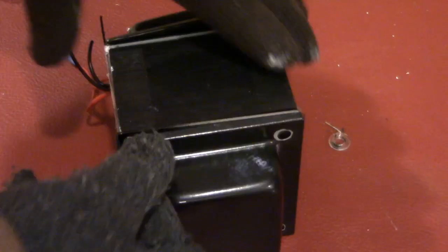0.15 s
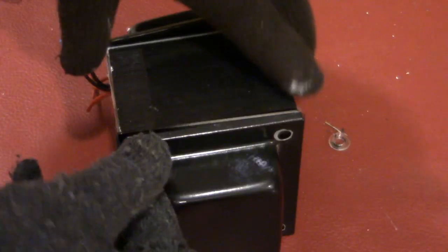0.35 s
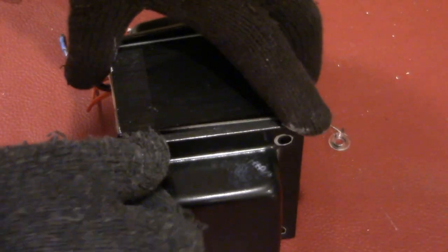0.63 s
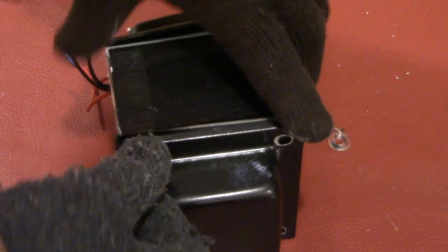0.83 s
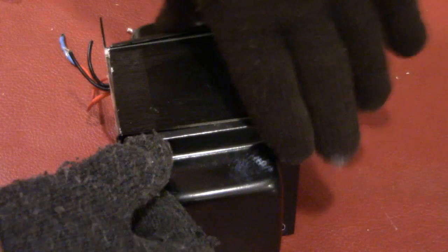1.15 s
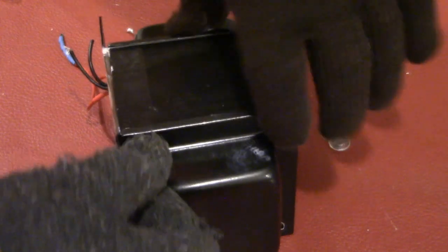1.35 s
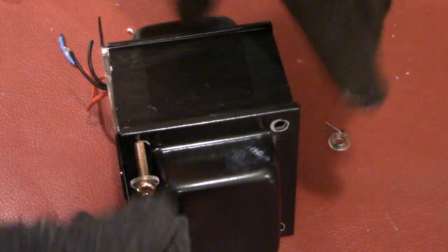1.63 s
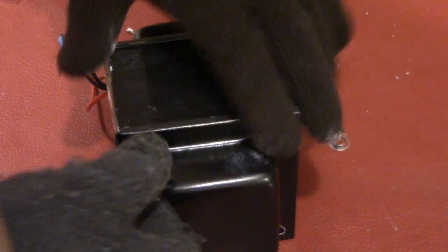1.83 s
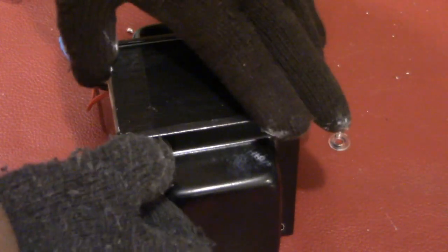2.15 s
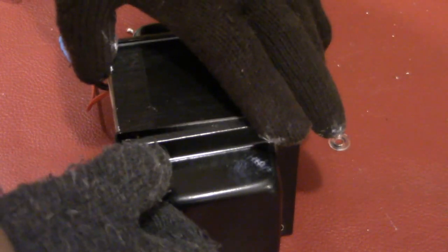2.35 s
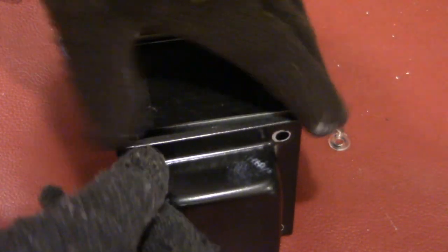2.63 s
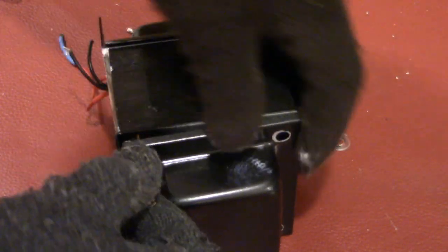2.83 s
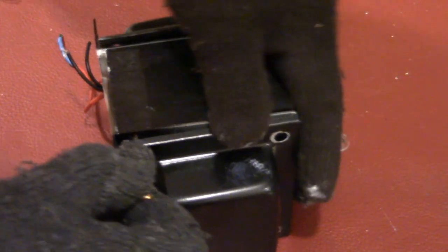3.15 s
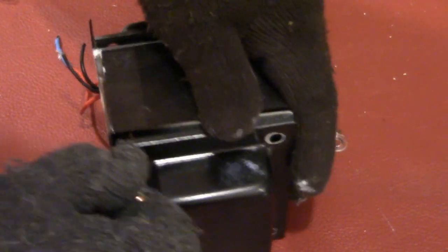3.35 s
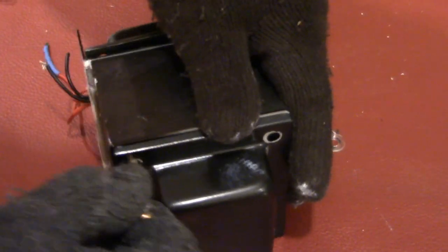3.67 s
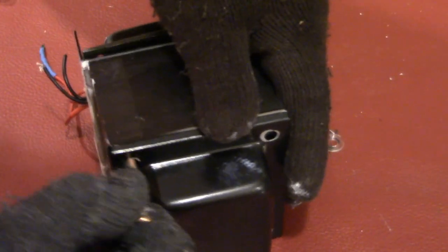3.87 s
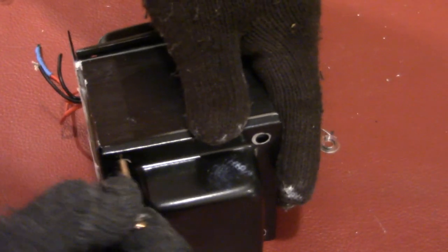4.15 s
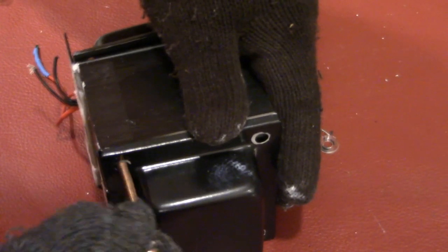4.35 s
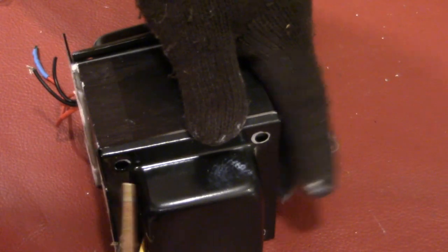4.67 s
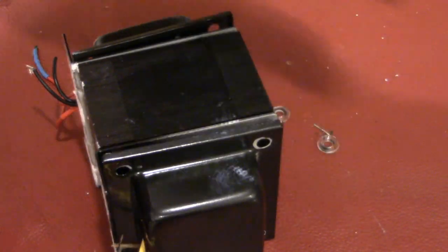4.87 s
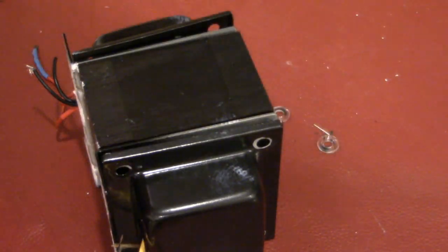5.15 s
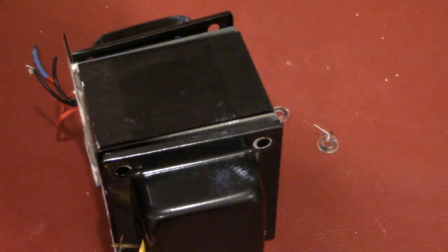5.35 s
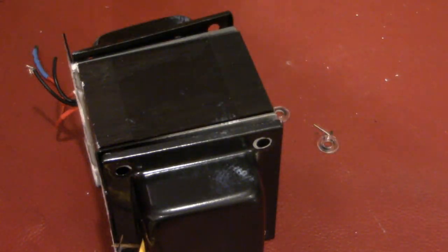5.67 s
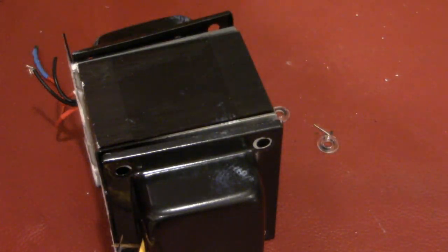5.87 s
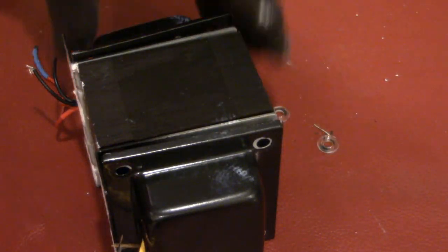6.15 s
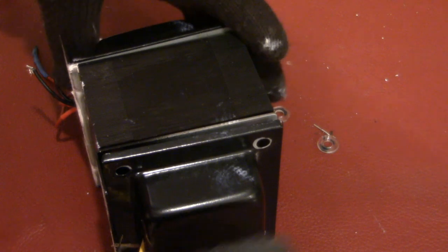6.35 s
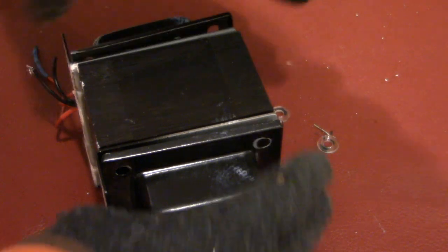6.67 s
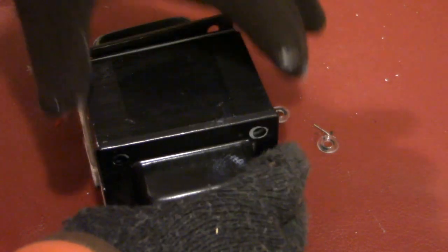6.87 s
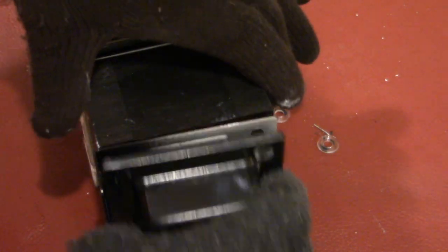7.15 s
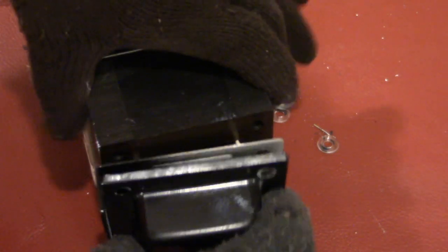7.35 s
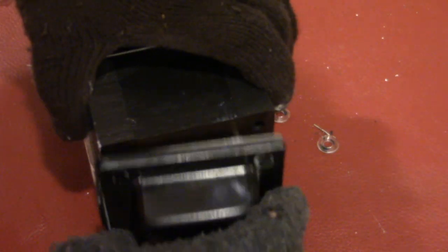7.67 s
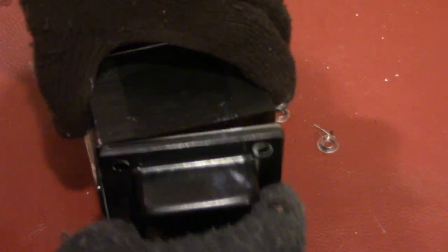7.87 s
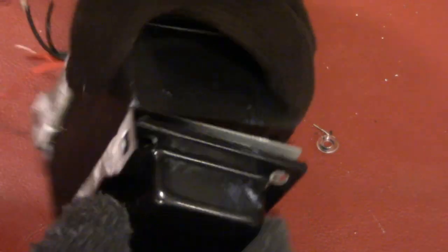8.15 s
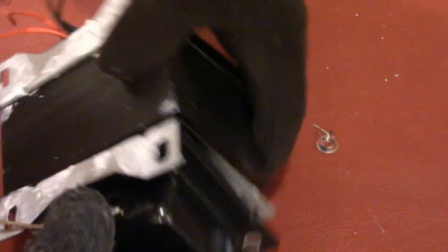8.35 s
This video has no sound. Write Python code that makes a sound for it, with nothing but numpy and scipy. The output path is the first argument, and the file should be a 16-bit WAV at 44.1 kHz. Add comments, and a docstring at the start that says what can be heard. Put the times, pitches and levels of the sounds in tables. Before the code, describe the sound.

Steel on steel, close-miked with slight stereo width and a short room tail over faint hush. Uneven clusters of hard, mid-pitched clacks with a short flange ring, knit gloves rubbing between them, one strong knock, then a rattling, raspy bolt withdrawal. A quiet gap, a clear high clink, and finally subdued taps, gritty sliding, a dull mat rub and a low padded thud.

```python
"""A padded bench in a small room: gloved hands work a pressed steel cover off a heavy iron transformer core.
The cover clacks, a long bolt rattles and rasps out, a small steel piece clinks down; then the cover is
drawn off and the core slid round and tipped on the mat. Steel is noisy contact force driving damped modes;
gloves, grinding, scrapes and drag are filtered grain; bumps are filtered noise bursts, over a steady hush."""
import sys
import numpy as np
from scipy import signal
from scipy.fft import rfft, irfft
from scipy.io import wavfile
from scipy.ndimage import uniform_filter1d

SR = 44100
rng = np.random.default_rng(int(sys.argv[2]) if len(sys.argv) > 2 else 0)


def inscribe(sig):
    """Save sig as 16-bit PCM at rate SR to the path in sys.argv[1].

    A 1-D sig is mono; a 2-D sig holds one channel per row.
    Samples are clipped to [-1, 1] before scaling.
    """
    pcm = np.round(np.clip(np.atleast_2d(sig).T, -1, 1) * 32767)
    wavfile.write(sys.argv[1], SR, pcm.astype(np.int16))


N = 375291


def gain_of(db):
    """Decibels to amplitude."""
    return 10 ** (np.asarray(db) / 20)


def evened(x):
    """Scales to rms 1."""
    return x / np.sqrt(np.mean(x ** 2) + 1e-20)


def read(points, hz):
    """Interpolates (Hz, value) points on a log-frequency axis."""
    point_hz, value = np.transpose(points)
    return np.interp(np.log(hz + 1), np.log(point_hz + 1), value)


def add(mix, start_s, sound):
    """Mixes a sound in at start_s."""
    part = mix[max(round(start_s * SR), 0):][:len(sound)]
    part += sound[:len(part)]


def colour(x, points, size=2048):
    """Causal minimum-phase filter with the given spectrum, (Hz, dB)."""
    log_gain = np.log(gain_of(read(points, abs(np.fft.fftfreq(size, 1 / SR)))))
    taps = np.fft.ifft(np.exp(np.conj(signal.hilbert(log_gain)))).real
    return signal.oaconvolve(x, taps)[:len(x)]


def band_energy(x, lo_hz, hi_hz):
    """Energy of x between two frequencies."""
    hz = np.fft.rfftfreq(len(x), 1 / SR)
    in_band = (hz > lo_hz) & (hz < hi_hz)
    return 2 * np.sum(abs(rfft(x)[in_band]) ** 2) / len(x)


def ring(modes, t, detune, scatter_db):
    """Exponentially dying modes; grip and point of impact shift their pitch and strength a little."""
    hz, width_hz, db = np.transpose(modes)[:, :, None]
    shift, strength, sign = rng.standard_normal((3, len(hz), 1))
    size = np.sign(sign) * gain_of(db + scatter_db * strength) * 2 * np.pi * width_hz / SR
    decay = np.exp(-np.pi * width_hz * t)
    tone = np.cos(2 * np.pi * hz * (1 + detune * shift) * t)
    return np.sum(size * decay * tone, 0)


def friction(stroke, spectrum, snags_per_s, snag_db, uneven_db):
    """Fine rubbing with sparse snags, under an unsteady pressure."""
    snags = (rng.random(N) < snags_per_s / SR) * rng.standard_normal(N)
    grain = rng.standard_normal(N) + gain_of(snag_db) * evened(snags)
    drift = uniform_filter1d(rng.standard_normal(N), size=700)
    pressure = evened(uniform_filter1d(drift, size=400))
    return stroke * gain_of(uneven_db * pressure) * evened(colour(grain, spectrum))


def strokes(rows, attack_s, release_s):
    """Each movement of the hand gathers speed, holds it and dies away."""
    t = np.arange(N) / SR
    envelope = np.zeros(N)
    for start_s, length_s, db in rows:
        attack = np.clip((t - start_s) / attack_s, 0, 1)
        release = np.exp(-np.maximum(t - start_s - length_s, 0) / release_s)
        envelope += gain_of(db) * attack * release
    return envelope


# Background hush spectrum. Each row: frequency in Hz, level in dB per Hz.
AIR_SPECTRUM = [(15, -60.5), (123, -12.5), (450, -8.5), (650, -13.5), (1520, -15.5), (11300, -32.5),
                (16000, -47)]
AIR_DB = -58


def air():
    """Steady background hush: filtered noise."""
    return gain_of(AIR_DB) * evened(colour(rng.standard_normal(N), AIR_SPECTRUM))


# Soft bumps on the bench. Each row: start in seconds, level in dB, decay in seconds, lowest frequency in Hz.
BENCH_BUMPS = [(.131, -38, 0.0048, 120), (0.16, -40, 0.009, 130), (7.751, -50, 0.082, 79),
               (8.414, -31.5, 0.035, 30)]
# Padded bench response. Each row: frequency in Hz, level in dB per Hz.
BENCH_SPECTRUM = [(30, -22), (80, -0.5), (380, -1.5), (600, -10.5), (6000, -40)]


def bumps():
    """Dull pushes on the padded bench: noise bursts through a low, damped response."""
    out, t = np.zeros(N), np.arange(SR // 3) / SR
    for start_s, db, decay_s, lowest_hz in BENCH_BUMPS:
        impulse = 1. * (t == 0)
        highpass = signal.butter(2, lowest_hz, "highpass", fs=SR)
        thump = signal.lfilter(*highpass, colour(impulse, BENCH_SPECTRUM))
        thump /= np.linalg.norm(thump)
        swell = np.minimum(t / .003, 1) * np.exp(-np.maximum(t - .008, 0) / decay_s)
        push = swell * rng.standard_normal(len(t))
        add(out, start_s, gain_of(db) * signal.fftconvolve(push, thump))
    return out


# Small piece set down. Each row: start in seconds, level in dB, hardness 0-1, finger damping factor (1 = free).
PIECE_CLINKS = [(5.101, -41, 0, 16), (0.16, -29, 0.18, 15), (5.688, -32, 0, 1.2),
                (5.8296, -14.5, 0.83, 1.23)]
# Small piece's modes, mostly beating pairs. Each row: frequency in Hz, width in Hz, level in dB at a soft
# touch, level in dB at a hard touch.
PIECE_MODES = [(2810, 29, 9, -0.5), (2865, 16, -12, 3), (7790, 22, -8, -2.5), (7820, 34, -34, 5),
               (15500, 38, -55, 8)]
# Tick of its touch. Each row: frequency in Hz, level in dB per Hz.
TOUCH_SPECTRUM = [(30, -19), (150, 0.5), (1600, -9.5), (3000, 6.5), (4500, -11.5), (16000, -9)]
TOUCH_DECAY_S, TOUCH_DB = 0.0074, -11.5
BOUNCE_GAP_S, BOUNCE_DB, BOUNCE_FADE_DB_PER_S = 0.0089, -8.5, -150


def small_piece(count=8):
    """Light steel touches down and rocks to rest in uneven, fading bounces; fingers choke ring and bounces."""
    out, t = np.zeros(N), np.arange(SR // 2) / SR
    for start_s, db, hardness, damping in PIECE_CLINKS:
        modes = [(hz, width_hz * damping, soft_db + (hard_db - soft_db) * hardness)
                 for hz, width_hz, soft_db, hard_db in PIECE_MODES]
        tone = ring(modes, t, detune=0, scatter_db=0)
        tick = evened(colour(rng.standard_normal(len(t)), TOUCH_SPECTRUM)) * np.exp(-t / TOUCH_DECAY_S)
        sound = gain_of(db) * (tone / abs(tone).max() + gain_of(TOUCH_DB) * tick)
        add(out, start_s, sound)
        for late_s in np.cumsum(BOUNCE_GAP_S * (.5 + rng.random(count))):
            bounce_gain = gain_of(BOUNCE_DB + BOUNCE_FADE_DB_PER_S * late_s) / damping
            add(out, start_s + late_s, bounce_gain * sound)
    return out


# Knitted gloves stroking steel. Each row: start in seconds, length in seconds, level in dB.
GLOVE_STROKES = [(.27, 0.22, -54), (.62, 0.35, -60.5), (1.44, 0.02, -38), (2.4, 0.15, -56.5),
                 (2.64, 0.54, -54), (4.55, 0.25, -60), (7.6, 0.13, -49.5), (7.9, 0.79, -53.5)]
# Glove rub spectrum. Each row: frequency in Hz, level in dB per Hz.
GLOVE_SPECTRUM = [(100, -4.5), (600, 1.5), (1000, 1), (1400, 13), (1800, -5.5), (3200, 1), (5000, -9),
                  (8000, -1), (11000, -12), (16000, -24)]
BRUSH_ATTACK_S, BRUSH_RELEASE_S = 0.063, 0.058


def gloves():
    """Knit rubbing over steel: fine grain with a few snags."""
    stroke = strokes(GLOVE_STROKES, BRUSH_ATTACK_S, BRUSH_RELEASE_S)
    return friction(stroke, GLOVE_SPECTRUM, snags_per_s=45, snag_db=-6.5, uneven_db=3.0)


EASE_DB_PER_S = -120  # contact pressure eases towards the end


def chatter(t, contact_s, rise_s, release_s, spikiness, order=3):
    """Rough contact from t = 0: a brief graze, then clumps of tiny impacts that ease off, even over frequency."""
    graze = np.exp(np.minimum(t, 0) / rise_s - np.maximum(t - contact_s, 0) / release_s)
    press = graze * gain_of(EASE_DB_PER_S * t)
    clumps = gain_of(2 * evened(uniform_filter1d(rng.standard_normal(len(t)), size=70)))
    impacts = rng.standard_normal(len(t)) * np.exp(spikiness * rng.standard_normal(len(t)))
    force = press * clumps * impacts
    # alternately flatten the spectrum and cut off the late part
    for _ in range(order):
        z = rfft(force)
        z /= np.sqrt(uniform_filter1d(abs(z) ** 2, size=len(t) // 50, mode="mirror") + 1e-12)
        force = irfft(z, len(t)) * (t < contact_s + 5 * release_s)
    return force / np.linalg.norm(force)


# Wash of the pressed sheet's weak modes. Each row: frequency in Hz, level in dB per Hz.
SHEET_SPECTRUM = [(200, -20), (1900, -5), (3300, -5), (7000, -5.5), (16000, -22)]
SHEET_WIDTH_HZ, SHEET_LOSS_HZ_PER_HZ, SHEET_DB = 9.6, 0.0033, -9.5


def sheet_wash(size):
    """Countless weak sheet modes blur to noise, new at each strike; the higher, the sooner they die."""
    hz, t, z = signal.stft(rng.standard_normal(size), SR, nperseg=256)
    width_hz = SHEET_WIDTH_HZ + SHEET_LOSS_HZ_PER_HZ * hz[:, None]
    wash = signal.istft(z * np.exp(-np.pi * width_hz * t), SR, nperseg=256)[1][:size]
    return gain_of(SHEET_DB) * colour(wash / np.linalg.norm(wash), SHEET_SPECTRUM)


# Modes of cover and core. Each row: frequency in Hz, width in Hz, level in dB.
COVER_MODES = [(456, 16, -13), (764, 87, -3.5), (862, 90, -7), (998, 37, -2), (1110, 160, -4.5),
               (1695, 38, -3), (2206, 31, 2), (3110, 87, -2), (3330, 80, -3), (3660, 71, -8),
               (4430, 73, -12), (5340, 45, -7.5), (6280, 40, -1.5), (7600, 97, -4.5), (9700, 110, -13)]
# Flange's close, beating modes. Each row: frequency in Hz, width in Hz, level in dB.
FLANGE_MODES = [(1333, 25.2, 2.5), (1408, 29, 0), (1383, 9, 6.5)]
# Quickly damped clack of the clamped parts. Each row: frequency in Hz, level in dB per Hz.
CLACK_SPECTRUM = [(160, -25.5), (400, -8), (900, -1), (1350, 1.5), (1900, -18), (3200, -2), (4800, -11),
                  (8000, -2.5), (11000, -8.5), (12500, -19.5), (16000, -19)]
# Thud, body, flange ring, clang, bite and edge. Each row: low limit in Hz, high limit in Hz.
REGISTER_BANDS = [(120, 550), (600, 1150), (1200, 1600), (1700, 2600), (2700, 5400), (5500, 15000)]
# mix ahead of the register levelling
CLACK_DB, MODES_DB = -3.0, 6
# in a rasp the contact point travels, so single modes stand out less
RASP_BLUR_DB_PER_S = 218
# a tight grip chokes the flange and passes more of the blow into the core's body and the bench
FLANGE_FREE_DB, FLANGE_CHOKE_DB, GRIP_WIDENS_HZ = 12, 18, 30
BODY_FREE_DB, BODY_GRIP_DB = -14.5, 23.5  # body against flange
THUD_FREE_DB, THUD_GRIP_DB = -20.5, 9
# while in its hole the bolt damps and slightly stiffens the flange (factor, added pitch fraction)
BOLT_OUT_S, BOLT_DAMPING, BOLT_STIFFENING = 4.6, 1.88, 0.0066


def knock(start_s, contact_s, db, edge_db, grip):
    """Chatter sets off a short clack and the longer modes; harder contacts have more bite and edge."""
    t = np.arange(12288) / SR - .003
    force = chatter(t, contact_s, rise_s=.0003, release_s=.0012, spikiness=.4)
    stiffer, damper = (1 + BOLT_STIFFENING, BOLT_DAMPING) if start_s < BOLT_OUT_S else (1, 1)
    flange_db = FLANGE_FREE_DB - FLANGE_CHOKE_DB * grip
    flange = [(hz * stiffer, width_hz * damper + GRIP_WIDENS_HZ * grip, level_db + flange_db)
              for hz, width_hz, level_db in FLANGE_MODES]
    rings = ring(COVER_MODES + flange, t - t[0], detune=.002 + .018 * grip, scatter_db=3)
    modes = gain_of(MODES_DB - RASP_BLUR_DB_PER_S * contact_s) * rings + sheet_wash(size=len(t))
    clack = gain_of(CLACK_DB) * colour(force, CLACK_SPECTRUM)
    sound = clack + signal.fftconvolve(force, modes)[:len(t)]
    # share the blow's energy out among the registers
    body = 1 / (1 + gain_of(-BODY_FREE_DB - BODY_GRIP_DB * grip) ** 2)
    share_db = np.array([THUD_FREE_DB + THUD_GRIP_DB * grip,
                         10 * np.log10(body),
                         10 * np.log10(1 - body),
                         0.3 * edge_db - 7.5,
                         0.5 * edge_db - 0.5,
                         edge_db])
    energy = np.array([band_energy(sound, *band) for band in REGISTER_BANDS])
    power = energy / ((contact_s + .006) * SR)
    levels_db = db + share_db - 10 * np.log10(power)
    shape = [(40, levels_db[0] - 28)]
    for (lo_hz, hi_hz), level_db in zip(REGISTER_BANDS, levels_db):
        shape += [(lo_hz * 1.08, level_db), (hi_hz / 1.08, level_db)]
    return start_s + t[0], colour(sound, shape)


# Steel knocking on steel; a long contact is a rasp. Each row: start in seconds, contact in seconds, clack
# level in dB, sharp edge in dB above the clack, grip on the cover 0-1.
COVER_KNOCKS = [(0.5584, 0.0032, -31.5, -9, 0.52), (0.9958, 0.0022, -15.5, -6, 0.6),
                (1.0081, 0.0021, -15.5, -7.5, 0.67), (1.1671, 0.012, -12, -7.5, 0.31),
                (1.184, 0.02, -22, -10.5, 0.47), (1.2084, 0.0074, -14.5, -6.5, 0.77),
                (1.39, 0.0024, -19, -15.5, 0.45), (1.674, 0.008, -23, -12, 0.29),
                (1.774, 0.006, -32, -15, 0.33), (1.945, 0.0017, -23.5, -21, 0.37),
                (1.952, 0.0048, -21.5, -6, 0.05), (2.0735, 0.0057, -27.5, -30, 1),
                (2.088, 0.006, -18.5, -11.5, 0.65), (2.114, 0.0041, -40, -34, .9),
                (2.1734, 0.0033, -28, -28, 0.57), (2.188, 0.0048, -27, -24, 0.43),
                (2.198, .005, -29, -25, 0.3), (2.2093, 0.0015, -34, -2, 0.7),
                (2.4524, 0.002, -32, -24, 0.46), (2.871, 0.0029, -35.5, -22, 0.43),
                (3.0778, 0.006, -33.5, -24.5, 0.52), (3.236, 0.0013, -12, -2.5, 0.41),
                (3.3837, 0.00054, -28.5, -0.5, 0.93), (3.5032, 0.0012, -34, -26.5, 0.77),
                (3.566, 0.0041, -23, -17.5, 0.57), (3.635, 0.011, -26.5, -22, 0.4),
                (3.823, 0.017, -32, -14.5, 0.6), (3.843, 0.0036, -20, -1.5, 1),
                (4.0266, 0.002, -20, -7, 0.7), (4.2, 0.0065, -16.5, -5.5, 0.56),
                (4.2889, 0.0026, -16, 1, 0.33), (4.302, .012, -16.5, -2.5, 0.8),
                (4.363, 0.038, -22, 1, 0.59), (4.4039, 0.036, -18.5, 0, 0.35),
                (4.7352, 0.0078, -40, -17, 0.22), (6.225, 0.01, -39.5, -15.5, 0.41),
                (6.484, 0.0025, -45, -22, 0.9), (6.538, 0.0076, -26, -12.5, 0.03),
                (6.799, 0.00079, -29, -27.5, 0.53), (7.6264, 0.0042, -43, -9, 0.13),
                (7.7306, 0.02, -37, -17.5, 0.38), (7.9343, 0.018, -31.5, -25.5, 0.1),
                (8.016, 0.0043, -42.5, -14, 0.3), (8.095, 0.0072, -39, -14.5, 0.56),
                (8.342, .009, -50, 0, 0), (8.4067, 0.004, -37, -13.5, 0.5)]
# Burr or bolt thread catching an edge. Each row: start in seconds, edge level in dB.
THREAD_TICKS = [(1.793, -28.5), (2.447, -44.5), (3.474, -39), (3.577, -30.5), (3.947, -36.5), (4.1294, -39),
                (7.744, -38), (8.485, -31.5)]
TICK_CONTACT_S, TICK_EDGE_DB, TICK_GRIP = 0.001276, 12, 0.93


def cover():
    """Knocks and rasps of the cover, and thin bright ticks: short, edgy, tightly gripped knocks."""
    out = np.zeros(N)
    for row in COVER_KNOCKS:
        add(out, *knock(*row))
    for start_s, db in THREAD_TICKS:
        add(out, *knock(start_s, TICK_CONTACT_S, db - TICK_EDGE_DB, TICK_EDGE_DB, TICK_GRIP))
    return out


# Pushes grinding cover on core. Each row: start in seconds, length in seconds, level in dB.
GRIND_PUSHES = [(2.06, 0.083, -52.5), (3.23, 0.044, -37), (3.54, 0.015, -36.5), (3.75, 0.55, -50.5)]
# Grinding spectrum of the core. Each row: frequency in Hz, level in dB per Hz.
CORE_SPECTRUM = [(50, -13), (175, 1.5), (950, -1), (1600, -10), (5000, -33)]
PUSH_ATTACK_S, PUSH_RELEASE_S = 0.019, 0.13


def grind():
    """Cover pressed and ground against the core: low, uneven, snagging friction."""
    stroke = strokes(GRIND_PUSHES, PUSH_ATTACK_S, PUSH_RELEASE_S)
    return friction(stroke, CORE_SPECTRUM, snags_per_s=300, snag_db=-8.5, uneven_db=4.0)


# Loosened cover sliding on the core. Each row: start in seconds, length in seconds, level in dB.
COVER_SLIDES = [(2.41, 0.128, -54), (7.125, 0.222, -58.5)]
SLIDE_RAMP_S, SLIDE_RING_DB = 0.014, 14.5


def slides():
    """Short gritty scrapes of steel on steel set the flange humming."""
    scrape = friction(1, CLACK_SPECTRUM, snags_per_s=220, snag_db=1, uneven_db=-3.0)
    flange = ring(FLANGE_MODES, np.arange(SR // 2) / SR, detune=0, scatter_db=0)
    hum = gain_of(SLIDE_RING_DB) * signal.oaconvolve(scrape, flange)[:N]
    return strokes(COVER_SLIDES, SLIDE_RAMP_S, SLIDE_RAMP_S) * evened(scrape + hum)


# Core dragged once over the mat. The row: start in seconds, length in seconds, level in dB.
CORE_DRAG = (7.995, 0.21, -44.5)
# Mat rub spectrum. Each row: frequency in Hz, level in dB per Hz.
MAT_SPECTRUM = [(100, -17), (1800, 2.5), (5000, -14.5), (14000, -36)]
DRAG_RAMP_S = 0.028


def drag():
    """Heavy core rubbing along the mat: dense, fairly even friction."""
    stroke = strokes([CORE_DRAG], DRAG_RAMP_S, DRAG_RAMP_S)
    return friction(stroke, MAT_SPECTRUM, snags_per_s=300, snag_db=-5, uneven_db=1.0)


# Reverberation time. Each row: frequency in Hz, t60 in seconds.
ROOM_T60 = [(150, 0.25), (1400, 0.48), (3500, 0.33), (8000, 0.37), (15000, 0.2)]
# Reverberation level. Each row: frequency in Hz, level in dB.
ROOM_SEND_SPECTRUM = [(100, -12.5), (400, -8), (1200, -14.5), (5000, -13), (9000, -22), (15000, -14)]


def room(x, count=3):
    """Sparse reflections, each band dying at its own speed; three patterns take turns in a steady cycle."""
    out = np.zeros(N)
    for k in range(count):
        taps = np.zeros(SR)
        at = np.arange(300, SR - 16, 16)
        taps[at + rng.integers(0, 16, len(at))] = rng.choice([-1., 1.], len(at))
        hz, t, z = signal.stft(taps, SR, nperseg=256)
        decay = gain_of(-60 * t / read(ROOM_T60, hz)[:, None])
        tail = signal.istft(z * decay, SR, nperseg=256)[1]
        # each weight cycles at 3.5 Hz
        share = np.sqrt(2 / count) * np.cos(np.pi * (7 * np.arange(N) / SR + k / count))
        response = colour(tail / np.linalg.norm(tail), ROOM_SEND_SPECTRUM)
        out += signal.fftconvolve(x * share, response)[:N]
    return out


def scene():
    """Everything reaches two close microphones nearly alike; their small spacing tells most in the treble."""
    direct = bumps() + small_piece() + gloves() + cover() + grind() + slides() + drag()
    mid = direct + room(direct) + air()
    spacing = gain_of(-24.0) * np.gradient(direct)
    side = gain_of(-20.0) * room(direct) + spacing + gain_of(-11) * air()
    return np.array([mid + side, mid - side])


BAND_LIMIT_HZ = 16200


def record(dry):
    """Clips at full scale, then low-passes at the band limit."""
    lowpass = signal.firwin(255, BAND_LIMIT_HZ, window=("kaiser", 9), fs=SR)
    return signal.oaconvolve(np.clip(dry, -1, 1), lowpass[None], "same")


dry = scene()
out = record(dry)
inscribe(out)
```